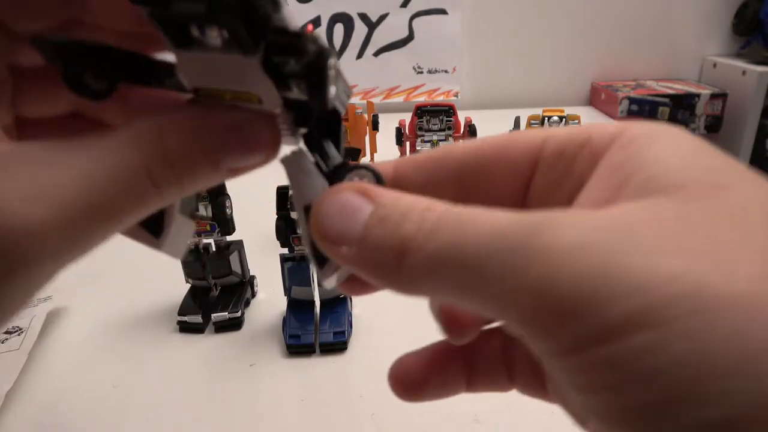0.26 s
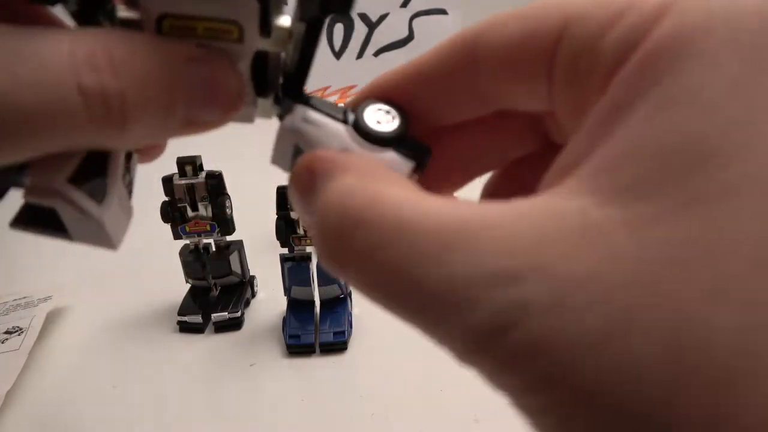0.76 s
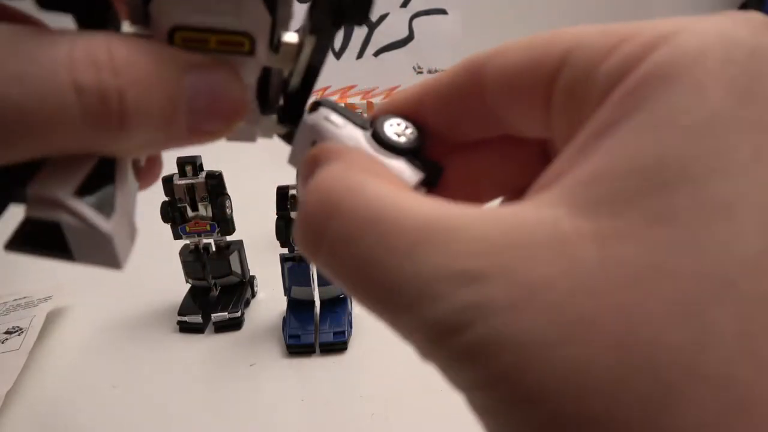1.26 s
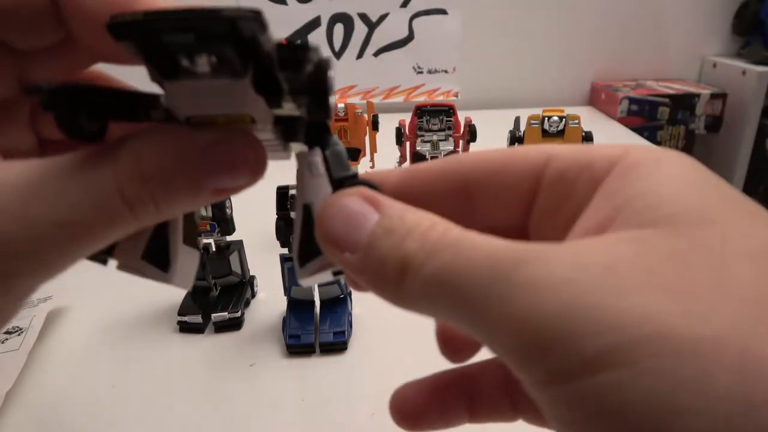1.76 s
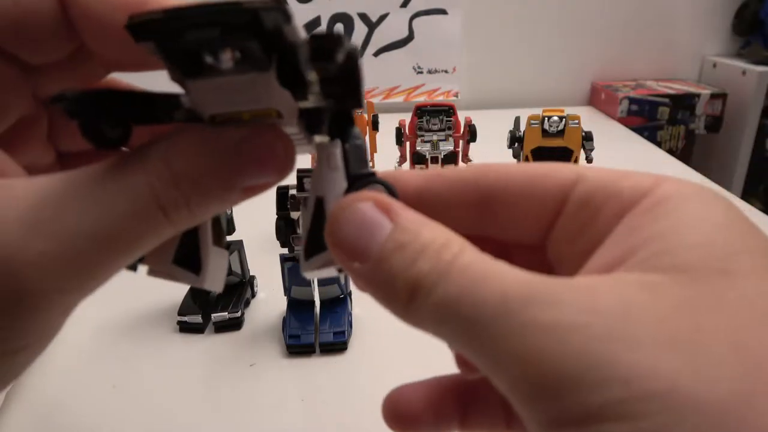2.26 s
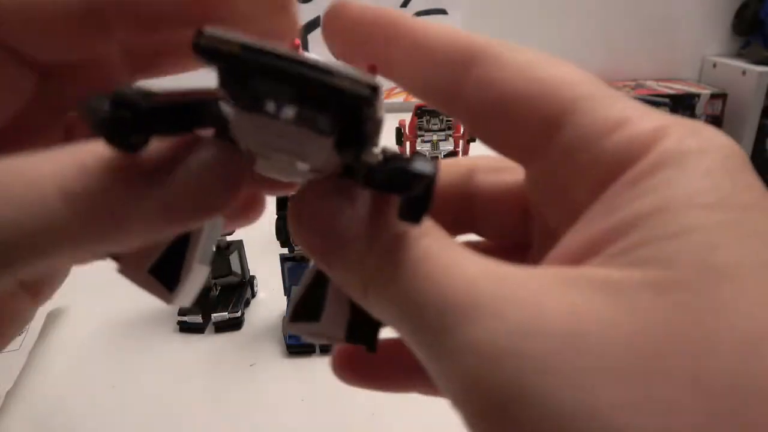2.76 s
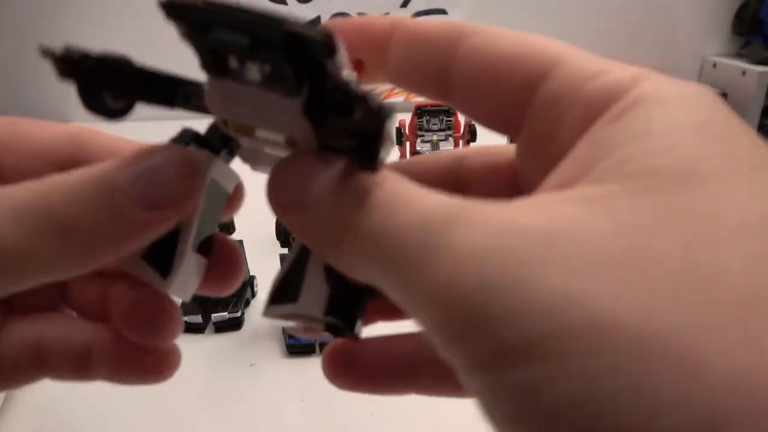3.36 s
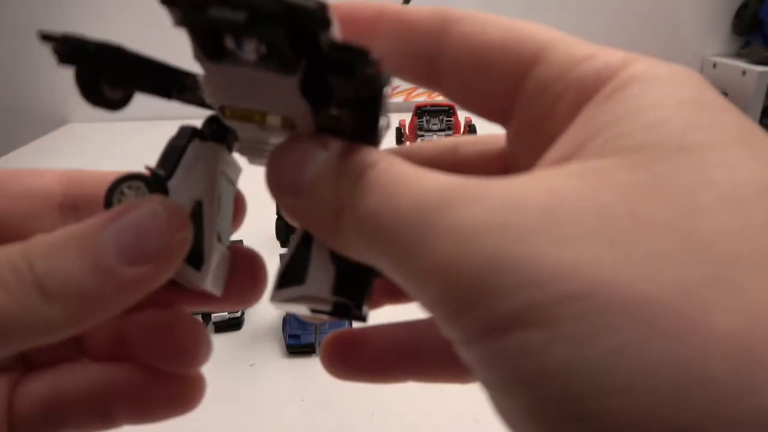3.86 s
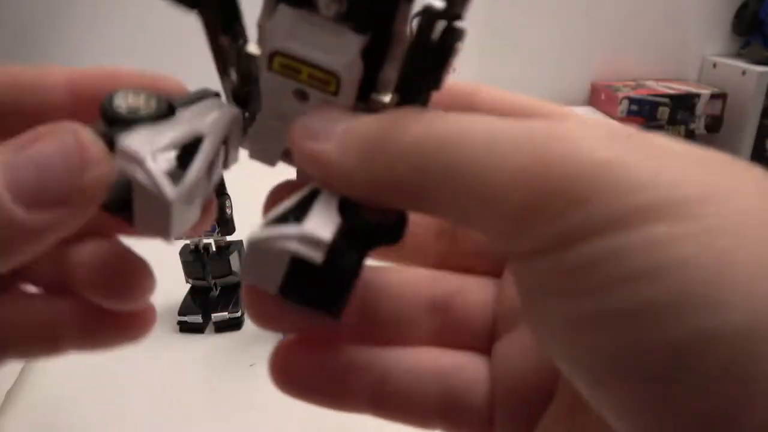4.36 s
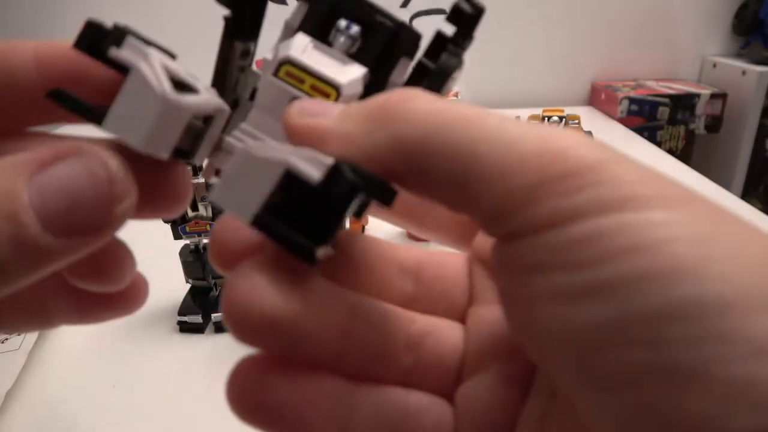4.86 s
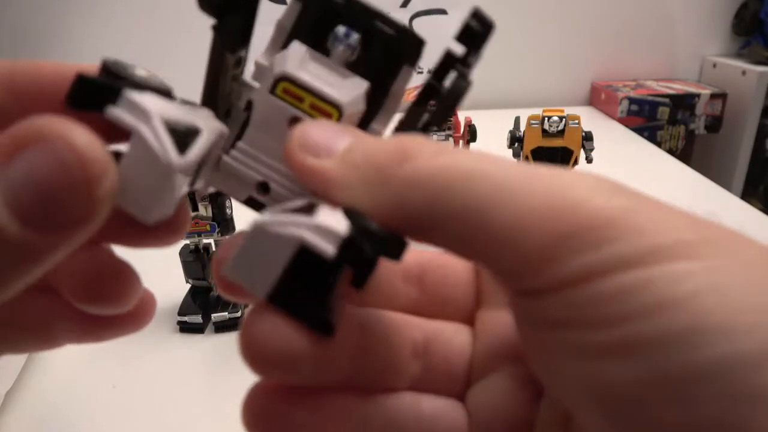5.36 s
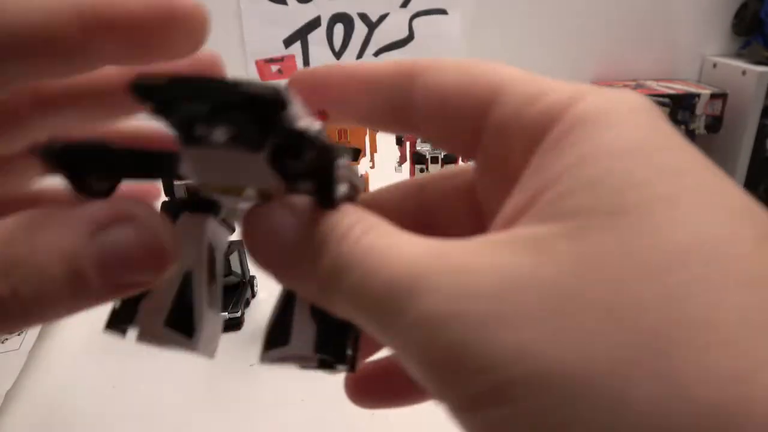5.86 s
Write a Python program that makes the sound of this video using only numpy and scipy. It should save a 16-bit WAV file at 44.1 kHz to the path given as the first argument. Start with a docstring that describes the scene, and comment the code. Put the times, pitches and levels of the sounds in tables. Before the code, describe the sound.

Close up, hands fold a small jointed plastic toy. Soft rubbing and a short creak lead to a loud crisp snap, then a cluster of clicks. Sparse ticks follow, then another sharp snap, rattling joints, brief creaks and a run of dull taps. After a lull, quick clicks end in a bright loud clack. The small room answers briefly over a faint hum.

```python
"""Plastic contacts tick and clatter as a toy robot is turned in the hands close by: each is a noise crack,
a pinging part and a ringing shell, balanced in five bands. Two panels snap loudly (decaying modes and a crack),
joints creak (slip pulses through resonances), fingers and panels slide (grainy noise through resonances), limbs
thump (decaying sines). A small quiet room answers (decaying noise) over a low hum (air noise, tones, drones)."""
import sys
import numpy as np
from scipy import signal
from scipy.fft import rfft, irfft, next_fast_len
from scipy.io import wavfile
from scipy.ndimage import map_coordinates

SR = 44100
rng = np.random.default_rng(int(sys.argv[2]) if len(sys.argv) > 2 else 0)


def to_wav(sig):
    """Store sig (one row per channel, or 1-D mono) as 16-bit WAV at the path in sys.argv[1].

    Samples outside -1..1 are clipped; the rate is SR.
    """
    pcm = np.clip(np.atleast_2d(sig), -1, 1) * 32767
    pcm = np.round(pcm).astype(np.int16)
    wavfile.write(sys.argv[1], SR, pcm.T)  # frames by channels


N = 268569

# Touching parts by name. Each row: pitch in Hz; knock, snap, tick and fizz in dB against the body band;
# rise in s, crack t60 in s, ping level in dB, ping t60 in s, settling level in dB against the contact.
PART_SOUNDS = {"panel": (2400, -12, -6, -10.5, -23, 0.0015, 0.03, -7.5, 0.0356, -11),
               "lid": (1880, -14.5, -5.5, -10, -18, -0.0009, 0.0335, -12, .015, -12),
               "shell": (2345, -19, -5.5, -17, -26, 0.0017, 0.01, -4.5, 0.01, -12),
               "flap": (2297, -14.5, -5.5, -11.5, -24, 0, 0.06, -3, 0.07, -10),
               "stop": (2640, -22, -13, -23, -29, .0005, .009, -8, 0.0052, -17),
               "latch": (2700, -22, -3.5, -8, -19.5, 0, 0.0263, -4.5, 0.03, -25),
               "hip": (3060, -17, -4.5, -13, -25, 0.0004, 0.0134, -5.5, 0.02, -15.5),
               "socket": (3250, -23, 1, -8.5, -23, 0.0017, 0.02, -9, 0.0155, -10),
               "hinge": (4145, -25, 6, -8, -22, .0006, .012, -7, .014, -20),
               "peg": (4550, -12, 5.5, -0.5, -11, .0004, .011, -6, .014, -19)}
# Fingers and panels sliding. Each row: start in s, end in s, base level in dB, rubbed part's pitch in Hz,
# singing of that part in dB over the base level.
RUB_STROKES = [(0, 0.085, -65, 2410, -2), (0.196, .322, -63.5, 2350, -4), (0.429, 0.55, -55.5, 2400, 0),
               (0.584, .69, -70, 2450, 8), (.747, .84, -63, 5900, -2), (1.057, 1.123, -48, 2870, -7),
               (1.403, 1.461, -53, 4300, -5), (1.511, 1.673, -64, 4700, 2),
               (2.298, 2.356, -61.5, 4300, -10), (2.497, 2.67, -55.5, 2450, 0.5),
               (2.679, 2.755, -54.5, 3040, -5), (2.873, 2.962, -61, 9050, -4),
               (3.024, 3.219, -58, 5400, -3), (3.239, 3.345, -55, 4400, -3), (3.336, 3.473, -56, 3000, -8),
               (3.893, 3.936, -57.5, 4400, -4), (4.102, 4.213, -61, 2930, -3),
               (4.193, 4.258, -59.5, 4050, 0), (4.248, 4.32, -58.5, 9550, -2),
               (4.313, 4.362, -57.5, 4070, 4), (4.352, 4.475, -62.5, 4040, -17),
               (4.436, 4.583, -56.5, 2360, -8), (5.467, 5.585, -58, 2485, -1),
               (5.56, 5.641, -64.5, 7170, 1.5), (5.857, 5.983, -55, 2220, 3)]


def amp(db):
    """Decibels to gain."""
    return 10 ** (np.asarray(db) / 20)


def unit(x):
    """Scale to rms 1."""
    return x / np.sqrt(np.mean(x ** 2) + 1e-20)


def along(points, hz):
    """Interpolate (Hz, value) points on a log frequency axis."""
    point_hz, values = np.transpose(points)
    return np.interp(np.log(hz + 1), np.log(point_hz + 1), values)


def filtered(x, response):
    """Multiply the zero-padded spectrum of x by a response of frequency in Hz."""
    n = x.shape[-1]
    padded = next_fast_len(n + 8192)
    spectrum = rfft(x, padded) * response(np.fft.rfftfreq(padded, 1 / SR))
    return irfft(spectrum, padded)[..., :n]


def coloured(x, spectrum):
    """Shape x by (Hz, dB) points, at rms 1."""
    return unit(filtered(x, lambda hz: amp(along(spectrum, hz))))


def resonances(table):
    """Causal response of parallel (Hz, width Hz, dB) resonances with alternating signs."""
    def response(f):
        total = 0
        for k, (hz, width_hz, db) in enumerate(table):
            total = total + (-1) ** k * amp(db) * 1j * f * width_hz / (hz * hz - f * f + 1j * f * width_hz)
        return total
    return response


def spread(pair, alike):
    """Mix two unrelated signals into left and right with a likeness set by frequency."""
    def mid_side_gains(hz):
        turn = np.arccos(np.clip(along(alike, hz), -1, 1)) / 2
        return np.array([np.cos(turn), np.sin(turn)])
    mid, side = filtered(pair, mid_side_gains)
    return np.array([mid + side, mid - side])


def add(track, start_s, sound):
    """Mix a sound into a track, cut at the track's end."""
    i = max(0, round(start_s * SR))
    part = track[..., i:i + sound.shape[-1]]
    part += sound[..., :part.shape[-1]]


def background(air_rms_db=-61):
    """Still air as shaped noise, low steady tones, and a distant fan's drones as narrow noise bands."""
    # Air spectrum. Each row: frequency in Hz, relative density in dB per Hz.
    air_spectrum = [(35, -34), (60, -10.5), (124, -12), (212, -7.5), (244, -10.5), (323, -8.5), (469, -17),
                    (651, -11.5), (785, -16), (1040, -13.5), (1440, -22), (3850, -30), (4640, -27),
                    (5090, -26.5), (16000, -31.5)]
    # Each row: frequency in Hz, left-right likeness from 0 to 1.
    air_alike = [(30, 0.83), (120, 0.69), (400, 0.76), (1000, 0.65), (3000, 0.91), (12000, 0.36)]
    # Steady hum. Each row: frequency in Hz, rms level in dB.
    hum_tones = [(48.4, -66.5), (34.5, -75)]
    # Fan drones. Each row: centre in Hz, rms level in dB, width in Hz.
    fan_drones = [(98.3, -75, 12), (209.7, -73, 25), (334.8, -76.5, 8.4), (1059, -69.5, 83)]
    t = np.arange(N) / SR
    noise = spread(rng.standard_normal((2, N)), air_alike)
    out = amp(air_rms_db) * coloured(noise, air_spectrum)
    for hz, db in hum_tones:
        out += amp(db) * unit(np.sin(2 * np.pi * hz * t))
    for hz, db, width_hz in fan_drones:
        drone = filtered(rng.standard_normal(N), lambda f: np.exp(-2 * ((f - hz) / width_hz) ** 2))
        out += amp(db) * unit(drone)
    return out


def room(x, delay_s=0.004, early_db=5, early_t60_s=0.086):
    """Table and near walls answer as a strong short decay over a longer diffuse one."""
    # Each row: frequency in Hz, t60 in s.
    room_t60 = [(200, 0.46), (2000, 0.39), (6000, 0.27), (14000, 0.27)]
    # Each row: frequency in Hz, left-right likeness from 0 to 1.
    room_alike = [(300, 0.5), (2000, .9), (5000, 0.7), (10000, .1)]
    hz, t, noise = signal.stft(rng.standard_normal((2, SR // 2)), SR, nperseg=256)
    late_decay = amp(-60 * t / along(room_t60, hz)[:, None])
    early_decay = amp(early_db - 60 * t / early_t60_s)
    tail = signal.istft(noise * (late_decay + early_decay), SR, nperseg=256)[1]
    tail = spread(tail, room_alike)
    tail /= np.linalg.norm(tail[0])
    delayed = np.pad(x, (round(delay_s * SR), 0))
    return signal.fftconvolve(delayed[None], tail, axes=1)[:, :N]


def thumps(t60_s=0.032):
    """The hand damps a stopping limb within a few low cycles."""
    # Limbs stopping. Each row: start in s, initial amplitude in dB, pitch in Hz.
    limb_stops = [(1.0567, -33.5, 207), (1.073, -47, 298), (1.426, -45.5, 189), (2.501, -53, 320),
                  (3.303, -47.5, 227), (4.536, -48, 156), (4.624, -52, 170), (4.663, -52, 155),
                  (4.784, -49, 176), (5.991, -45.5, 226)]
    out, t = np.zeros(N), np.arange(SR // 8) / SR
    for start_s, db, hz in limb_stops:
        add(out, start_s, amp(db - 60 * t / t60_s) * np.sin(2 * np.pi * hz * t))
    return out


def rubs(grain_db=4.0, grains_per_s=500, part_width_hz=220, scrape_db=-1):
    """Grains of friction ring the shell and the rubbed part, under a fine hiss of skin."""
    # Shell as a rub excites it. Each row: frequency in Hz, width in Hz, level in dB.
    scraped_shell = [(1716, 70, -3), (2360, 320, -1.5), (2950, 710, -7.5), (4100, 500, -2),
                     (5480, 290, -4.5), (7600, 300, -6.5)]
    # Skin hiss spectrum. Each row: frequency in Hz, relative level in dB.
    hiss_spectrum = [(4500, -31), (7800, -13), (9400, -10), (11500, -16), (16000, -24)]
    # a higher-pitched rub hisses more; at the even pitch the hiss has the base level
    hiss_db_per_octave, hiss_even_hz = 4, 9100
    out = np.zeros(N)
    knots = np.arange(N) * grains_per_s / SR
    grains = np.array([np.interp(knots, np.arange(N), row) for row in rng.standard_normal((3, N))])
    friction = rng.standard_normal((3, N)) * amp(grain_db * grains)
    scrape = unit(filtered(friction[0], resonances(scraped_shell)))
    hiss = coloured(friction[1], hiss_spectrum)
    for start_s, end_s, db, hz, part_db in RUB_STROKES:
        span = slice(max(0, round(start_s * SR)), round(end_s * SR))
        part = unit(filtered(friction[2, span], resonances([(hz, part_width_hz, 0)])))
        hiss_db = hiss_db_per_octave * np.log2(hz / hiss_even_hz)
        stroke = amp(scrape_db) * scrape[span] + amp(hiss_db) * hiss[span] + amp(part_db) * part
        add(out, start_s, amp(db) * stroke * signal.windows.tukey(len(stroke), 0.5))
    return out


def creaks(jitter_periods=0.018, size_scatter_db=1, grit=0.22, grit_t60_s=0.005):
    """A tight joint sticks and slips; every slip rings the joint's resonances."""
    # Each row: start in s, end in s, first and last slips per s, first and last level in dB,
    # joint (0 knee, 1 shoulder).
    joint_turns = [(0.214, 0.303, 172.5, 258, -61.5, -62, 0), (0.301, 0.353, 306, 209.4, -48, -40, 0),
                   (3.134, 3.19, 84.8, 122.4, -52.5, -50, 1), (3.242, 3.289, 127.4, 143, -40.5, -40.5, 1),
                   (3.978, 4.035, 140.4, 148, -62.5, -61.5, 1)]
    # Joint resonances. Each row: frequency in Hz, width in Hz, level in dB.
    knee = [(2430, 260, -7), (4200, 820, -7.5), (5400, 650, 0), (6280, 610, -5.5), (7000, 500, -8),
            (8600, 330, -3), (10300, 1500, -20.5)]
    # Columns as for the knee.
    shoulder = [(2310, 490, 6.5), (2696, 310, 8.5), (3830, 710, 7), (4460, 470, 14.5), (5600, 500, -1),
                (7820, 480, 2.5), (10500, 1500, -19)]
    out, t = np.zeros(N), np.arange(SR // 50) / SR
    for start_s, end_s, rate0, rate1, db0, db1, joint in joint_turns:
        n = round((end_s - start_s) * SR)
        cycles = np.cumsum(np.linspace(rate0, rate1, n)) / SR
        ringing = resonances(shoulder if joint > 0.5 else knee)
        train = np.zeros(n + SR // 20)
        for i in np.searchsorted(cycles, np.arange(cycles[-1])):
            pulse = (t == 0) + grit * rng.standard_normal(len(t)) * amp(-60 * t / grit_t60_s)
            slip = unit(filtered(pulse, ringing))
            slip_s = i / SR + jitter_periods * rng.normal() / rate0
            slip_db = (db1 - db0) * (i / n - 0.5) + size_scatter_db * rng.normal()
            add(train, slip_s, slip * amp(slip_db))
        add(out, start_s, train * amp((db0 + db1) / 2) / train[:n].std())
    return out


def snaps(crack_db=2, crack_t60_s=0.0057, attack_s=0.00033, left_over_right_db=1.5):
    """A panel springs over its catch and rings with its own modes."""
    # Loud snaps. Each row: start in s, rms level of the first 5 ms in dB, panel (0 door, 1 hood).
    panel_snaps = [(0.54, -23, 0), (2.6349, -22.5, 1)]
    # Panel modes. Each row: frequency in Hz, level in dB, t60 in s.
    door_modes = [(1220, -11.5, 0.021), (1605, -11.5, 0.034), (2350, -10, .04), (2670, 0, 0.01),
                  (4300, 1.5, 0.011), (4700, -1.5, 0.012), (5560, 0.5, 0.018), (6330, 8, 0.0058),
                  (7420, -0.5, 0.013), (8770, -7, 0.013), (12100, -0.5, 0.0087), (12840, -10, .016)]
    # Columns as for the door.
    hood_modes = [(1791, -4, 0.044), (1940, 1, 0.023), (2335, -9, 0.045), (2625, 1, 0.021),
                  (2870, -10, 0.041), (3730, -4, 0.023), (4120, -13.5, 0.075), (4400, -4.5, 0.023),
                  (4600, -10, 0.032), (5510, -1, 0.019), (5600, -13, 0.015), (7350, -7, 0.032),
                  (8200, -12, 0.012), (9050, -13, 0.051)]
    crack_spectrum = [(900, -16.5), (1800, -5.0), (5800, -2.5), (10000, -10), (15000, -30)]  # Hz, dB
    out, t = np.zeros(N), np.arange(SR // 8) / SR
    head = SR // 200
    for start_s, db, panel in panel_snaps:
        ring = np.zeros(len(t))
        for hz, mode_db, t60_s in hood_modes if panel > 0.5 else door_modes:
            ring += amp(mode_db - 60 * t / t60_s) * np.sin(2 * np.pi * (hz * t + rng.random()))
        crack = coloured(rng.standard_normal(len(t)), crack_spectrum) * amp(crack_db - 60 * t / crack_t60_s)
        sound = (ring + crack) * (1 - np.exp(-t / attack_s))
        add(out, start_s, amp(db) * sound / sound[:head].std())
    return out * amp([[left_over_right_db / 2], [-left_over_right_db / 2]])


def contacts():
    """List contacts as (s, dB, part, hardness): clicks, one settling of each, light catches of sliding edges."""
    # Plastic contacts. Each row: start in s, body level in dB, part name, hardness in dB per octave.
    main_clicks = [(0.4354, -47.5, "peg", -0.5), (0.4795, -41, "shell", 1.5), (0.5014, -48, "flap", -4),
                   (0.5283, -41, "shell", 1), (0.5544, -36, "shell", -1), (0.6529, -43, "peg", -1),
                   (1.056, -38, "panel", 6.5), (1.0691, -33.5, "hip", 6), (1.0794, -32, "socket", -1.5),
                   (1.0959, -31, "stop", -9), (1.2872, -55, "panel", 2), (1.3362, -53, "peg", 0),
                   (1.3972, -46.5, "peg", 1), (1.4259, -35, "stop", 4), (1.4442, -51.5, "peg", 3),
                   (1.531, -46, "hinge", -2), (1.557, -56, "peg", 3), (1.6683, -51, "peg", -0.5),
                   (2.2886, -50.5, "latch", 4.5), (2.3325, -43, "hinge", -2.5), (2.351, -43, "hinge", 1.5),
                   (2.3737, -48.5, "stop", -2), (2.4407, -51, "latch", 2.5), (2.4815, -43, "hinge", -1.5),
                   (2.5012, -30, "stop", 1), (2.5065, -38, "hip", -1), (2.5148, -41.5, "lid", 3),
                   (2.523, -35.5, "shell", -1.5), (2.714, -37.5, "socket", -1), (2.7272, -45.5, "peg", 1.5),
                   (2.777, -43, "hip", -1), (2.799, -49, "hip", -4), (2.964, -51, "lid", -2.5),
                   (3.0368, -37.5, "hip", -6), (3.0478, -44, "shell", -4), (3.07, -45.5, "hip", 0.5),
                   (3.0996, -43, "hip", 1), (3.123, -43.5, "hip", 0.5), (3.2265, -49, "peg", 0),
                   (3.2962, -46, "hinge", 2.5), (3.303, -49, "peg", 0), (3.377, -42.5, "latch", -1),
                   (3.418, -42, "hip", -0.5), (3.4354, -42.5, "hip", 5), (3.4544, -40.5, "hip", -0.5),
                   (3.8349, -46.5, "hinge", 0), (3.875, -51.5, "peg", -2.5), (3.8932, -54, "peg", 3),
                   (3.9005, -54, "peg", -3), (4.0812, -42, "hinge", 4), (4.0863, -45.5, "hip", 4),
                   (4.4542, -42, "shell", -1.5), (4.4686, -49, "panel", 1), (4.4797, -46, "panel", 1.5),
                   (4.5344, -41.5, "panel", 1), (4.5455, -46, "shell", -3), (4.5689, -44.5, "panel", -1.5),
                   (4.6216, -38.5, "lid", 0), (4.6633, -40, "panel", 1.5), (4.7249, -42.5, "panel", -2.5),
                   (4.7479, -43.5, "panel", -3.5), (4.7845, -39, "panel", -0.5), (4.8233, -42, "panel", 0),
                   (4.85, -44, "panel", 0.5), (4.8712, -42.5, "panel", 0.5), (4.9129, -41, "panel", 1),
                   (4.9421, -46, "panel", 2.5), (5.158, -54.5, "lid", 4), (5.2033, -51.5, "lid", -0.5),
                   (5.5192, -51, "panel", 1.5), (5.5546, -45.5, "hip", -0.5), (5.8203, -50, "lid", -0.5),
                   (5.8466, -35, "socket", -0.5), (5.896, -38, "lid", -11), (5.9312, -35, "hip", 2),
                   (5.9388, -41, "hip", -3), (5.9498, -43, "peg", 2), (5.972, -39, "flap", 4.5),
                   (5.9833, -22, "socket", -2), (5.99, -16.5, "latch", 0), (5.9966, -19, "latch", 1.5),
                   (6.005, -29, "flap", 2.5), (6.0249, -27, "flap", 0.5), (6.0318, -31.5, "flap", 2),
                   (6.0417, -26, "flap", 2)]
    settle_s, settle_log_spread = 0.008, 0.3
    catch_per_s, catch_over_rub_db, catch_scatter_db = 28, -2, 4
    grip_s = 0.02  # the start and end of a rub are too light to catch
    delays_s = settle_s * np.exp(settle_log_spread * rng.standard_normal(len(main_clicks)))
    settles = []
    for (s, db, part, hardness), delay_s in zip(main_clicks, delays_s):
        settles.append((s + delay_s, db + PART_SOUNDS[part][-1], part, hardness))
    catches = []
    for (start_s, end_s, db, hz, _), draws in zip(RUB_STROKES, rng.random((len(RUB_STROKES), 16, 2))):
        # the part nearest in pitch catches; the louder of body and snap is set against the rub
        part = min(PART_SOUNDS, key=lambda name: abs(PART_SOUNDS[name][0] - hz))
        catch_db = db + catch_over_rub_db - max(PART_SOUNDS[part][2], 0)
        for k, (when, size) in enumerate(draws):
            s = start_s + (k + when) / catch_per_s
            if start_s + grip_s < s < end_s - grip_s:
                catches.append((s, catch_db + catch_scatter_db * (2 * size - 1), part, 0))
    return main_clicks + settles + catches


def clicks(shell_db=-23, buzz_db=-18, buzz_t60_s=0.061, hold=1.33, scatter_db=3.5, side_db=1, pan_db=1.46):
    """Each contact is a short crack; the struck part pings, its neighbours buzz and the shell rings on."""
    # Shell modes. Each row: frequency in Hz, level in dB, t60 in s.
    shell_modes = [(1750, -22, 0.059), (2130, -13.5, 0.21), (2310, -8, 0.12), (2350, -10, 0.091),
                   (2450, -4, 0.11), (2580, -6, 0.066), (2750, -19, 0.05), (2870, -18, 0.11),
                   (3060, -27, 0.1), (3100, -12, 0.075), (3286, -6, 0.091), (3890, -9, 0.11),
                   (4140, -1.5, .06), (4400, 3.5, 0.051), (4830, -11, 0.11), (5150, -21, 0.053),
                   (5900, -21, .08), (7240, -20, 0.058), (7900, -16, 0.063), (7600, -3, 0.063),
                   (8950, -15, 0.08), (10130, -8, 0.077), (11500, -16, .05)]
    # Knock, body, snap, tick, fizz. Each row: lower edge in Hz, upper edge in Hz.
    bands_hz = [(300, 1300), (1600, 3300), (3300, 6300), (6500, 10300), (10500, 14000)]
    usual_db, knock_lag = -42.5, 0.33  # dB of knock lost per dB of body over a usual contact
    grip_detune = 0.051  # the grip shifts a part's pitch at each contact (log spread)
    out, t = np.zeros((2, N)), np.arange(SR // 6) / SR
    head = SR // 200
    hz, mode_db, t60_s = np.transpose(shell_modes)[:, :, None]
    modes = amp(mode_db - 60 * t / t60_s) * np.exp(2j * np.pi * hz * t)
    filters = [signal.butter(3, band, 'bandpass', fs=SR, output='sos') for band in bands_hz]
    centres = np.log2(bands_hz).mean(axis=1)
    octaves_over_body = np.maximum(centres - centres[1], 0)
    band_index = np.arange(len(bands_hz))
    for s, db, part, hardness in contacts():
        part_hz, knock, snap, tick, fizz, rise_s, crack_t60_s, ping_db, ping_t60_s, _ = PART_SOUNDS[part]
        # the edges grind for a moment, then chatter and let go
        rise = np.minimum(t / max(rise_s, 1 / SR), 1)
        age_s = np.maximum(t - rise_s, 0)
        chatter = np.exp(-(np.log(1000) * age_s / crack_t60_s) ** hold)
        buzz = amp(buzz_db - 60 * age_s / buzz_t60_s)
        crack = rng.standard_normal(len(t)) * (chatter + buzz)
        ping_hz = part_hz * np.exp(grip_detune * rng.normal())
        ping = amp(ping_db - 60 * age_s / ping_t60_s) * np.sin(2 * np.pi * ping_hz * t)
        phases = np.exp(2j * np.pi * rng.random(len(shell_modes)))
        strengths = amp(scatter_db * rng.standard_normal(len(shell_modes))) * phases
        ring = amp(shell_db) * (strengths @ modes).imag
        # the knock lies below every shell mode: crack only
        sources = [crack] + [crack + ping + ring] * (len(filters) - 1)
        bands = np.array([signal.sosfilt(sos, rise * source) for sos, source in zip(filters, sources)])
        # hardness tilts the balance of the first 5 ms
        balance_db = np.array([knock - knock_lag * (db - usual_db), 0, snap, tick, fizz])
        balance_db += hardness * octaves_over_body
        bands *= (amp(db + balance_db) / bands[:, :head].std(axis=1))[:, None]
        # higher bands beam more unevenly to left and right
        pan = (side_db + pan_db * rng.standard_normal(len(bands_hz)) * band_index / 2) / 2
        add(out, s, amp(np.array([pan, -pan])) @ bands)
    return out


def scene(room_db=-11):
    """The toy close by, its room's answer and the background."""
    air = background()
    toy = snaps() + creaks() + rubs() + thumps() + clicks()
    return toy + amp(room_db) * room(toy.mean(axis=0)) + air


def record(dry, top_hz=15900):
    """Steep zero-phase low-pass, half amplitude at its band limit."""
    return filtered(dry, lambda hz: 1 / (1 + (hz / top_hz) ** 120))


dry = scene()
out = record(dry)
to_wav(out)
```